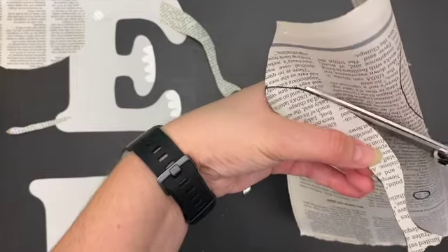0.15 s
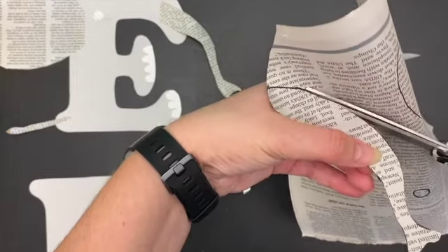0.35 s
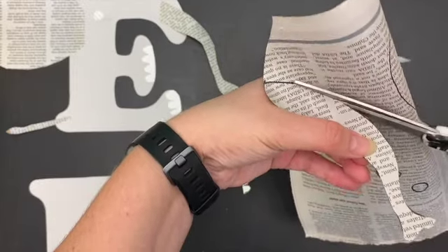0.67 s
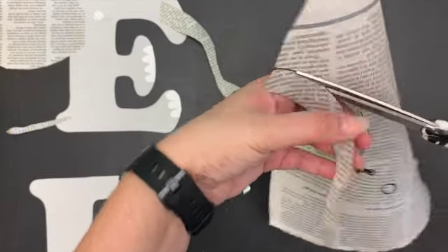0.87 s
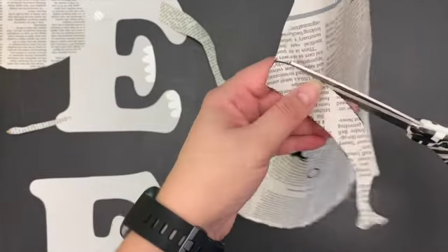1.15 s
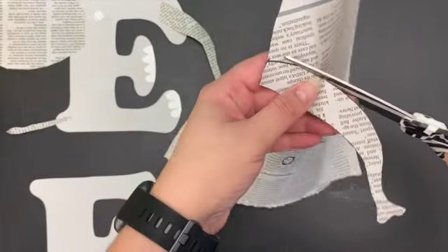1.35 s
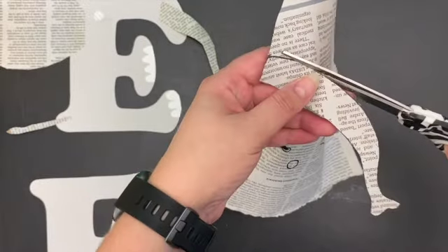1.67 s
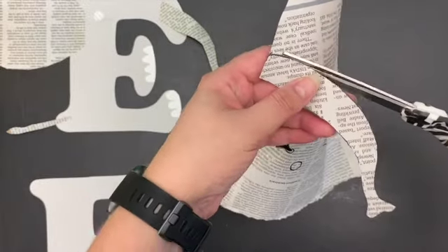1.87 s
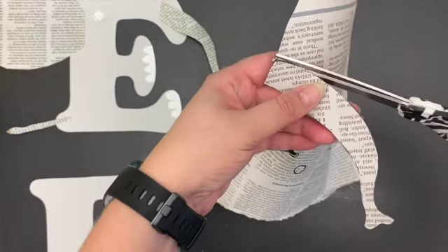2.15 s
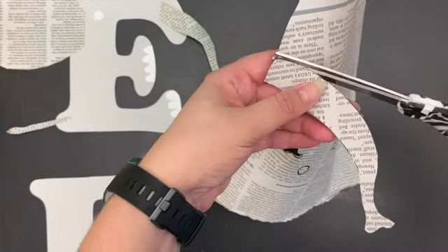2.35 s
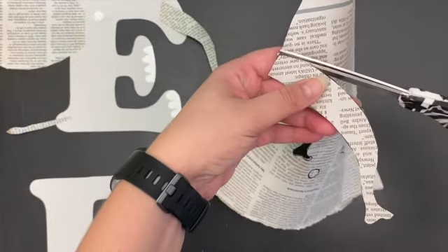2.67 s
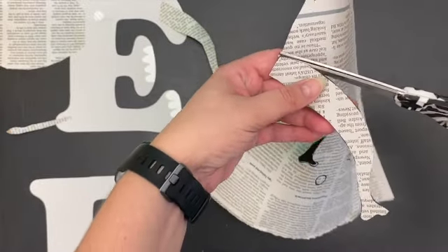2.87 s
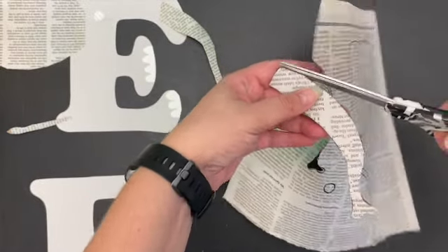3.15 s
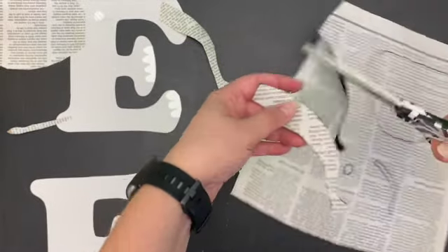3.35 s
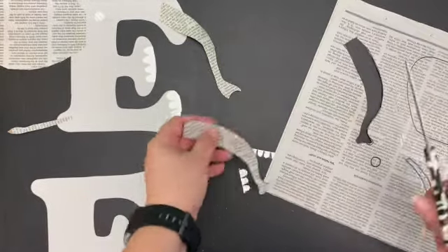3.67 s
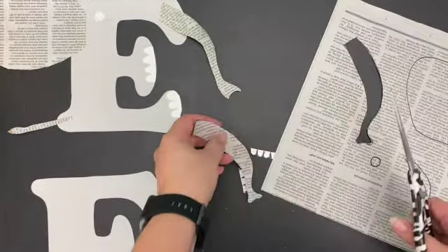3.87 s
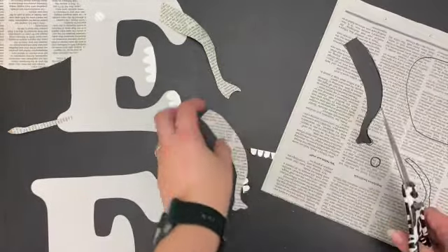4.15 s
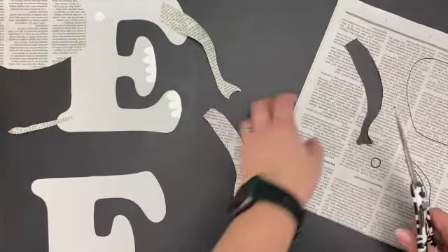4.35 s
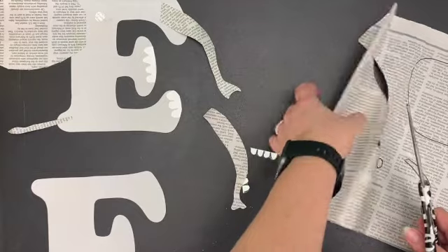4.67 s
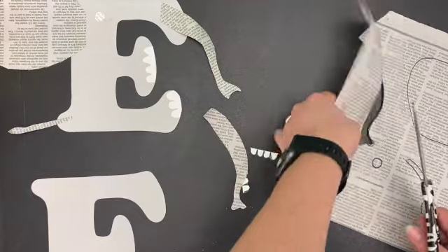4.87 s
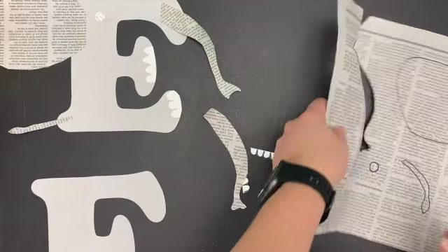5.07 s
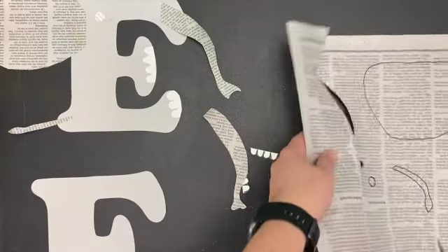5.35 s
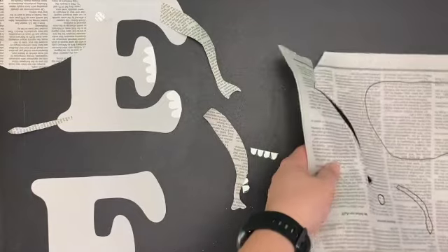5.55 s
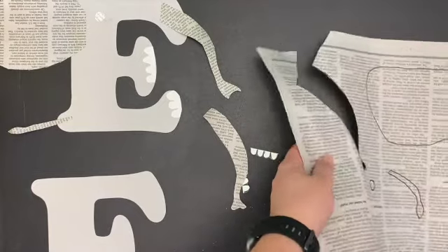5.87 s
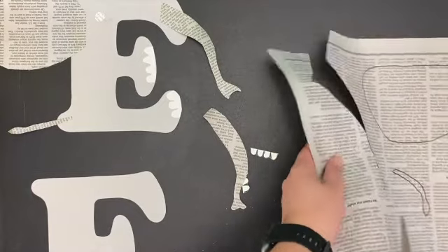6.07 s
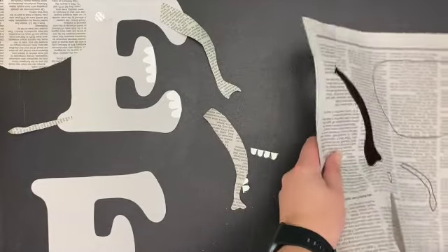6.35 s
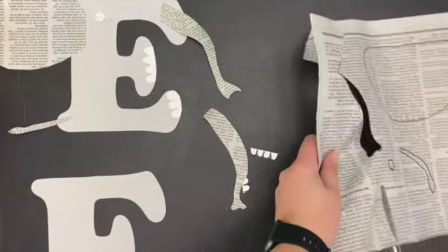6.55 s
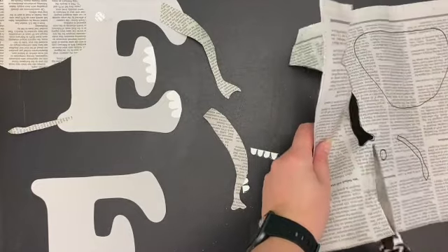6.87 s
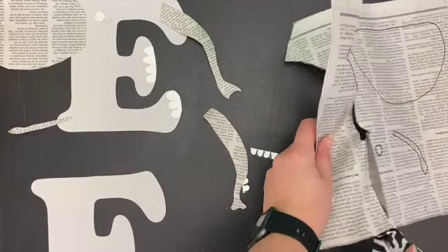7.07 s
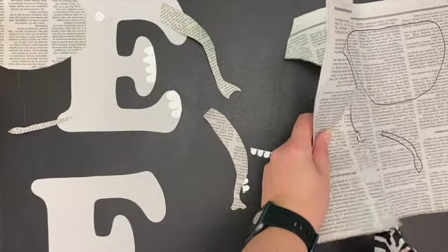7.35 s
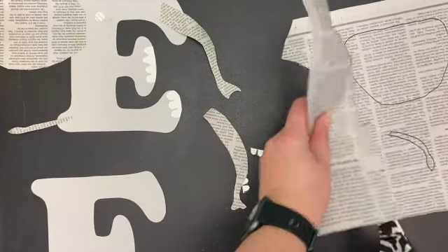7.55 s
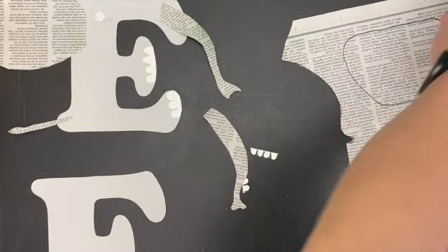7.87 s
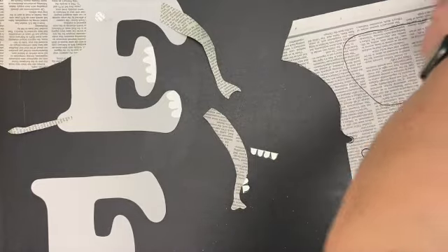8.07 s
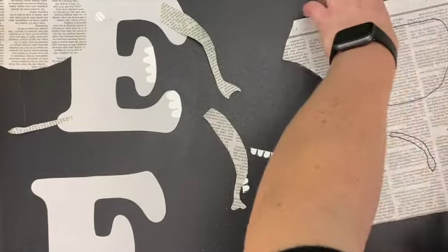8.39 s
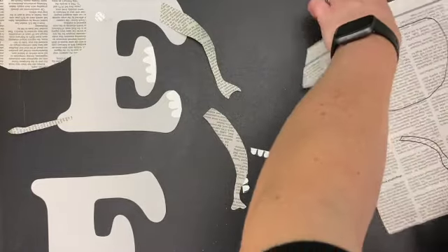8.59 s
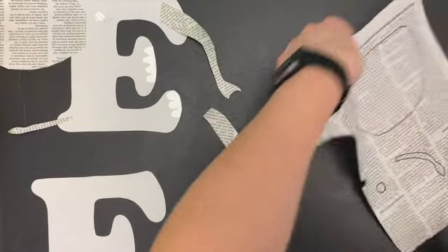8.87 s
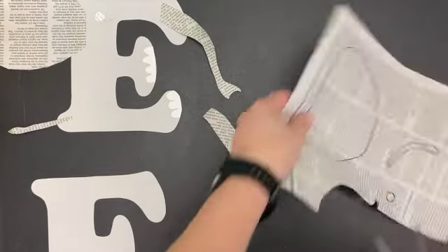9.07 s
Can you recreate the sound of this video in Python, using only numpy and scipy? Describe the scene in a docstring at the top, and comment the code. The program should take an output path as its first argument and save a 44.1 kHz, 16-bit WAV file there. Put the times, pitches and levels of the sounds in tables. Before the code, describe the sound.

Scissors bite through thin newsprint in uneven runs, with fibres crackling and creases popping. After the piece comes free there is a quiet gap, a muffled hand knock on the tabletop and paper sliding. Louder, faster snips follow, then a lull, a solid palm thump, and sharp rustling. Heard from very near, with faint room hum and hiss.

```python
"""Scissors snip through newspaper that rustles, swishes and snaps; a hand lands on a table and drags over it.
Rubbing is coloured noise that catches and slips, with fibres cracking in it; snaps are short coloured bursts.
Landings and drags ring the modes of the table top.
A quiet room adds sparse echoes, hum and hiss; two close microphone ports hear it all."""
import sys
import numpy as np
from scipy import signal
from scipy.fft import rfft, irfft, next_fast_len
from scipy.io import wavfile
from scipy.ndimage import uniform_filter1d

SR = 44100
rng = np.random.default_rng(int(sys.argv[2]) if len(sys.argv) > 2 else 0)


def voltage_ratio(level):
    """Linear amplitude factor for a level in decibels (scalar or array-like)."""
    return 10 ** (np.asarray(level, float) / 20)


def generate_wav(signal):
    """Clip the signal to [-1, 1] and save it as 16-bit WAV at the path in sys.argv[1]."""
    frames = np.transpose(np.atleast_2d(signal))
    scaled = np.clip(frames, -1, 1) * 32767
    pcm = np.round(scaled).astype(np.int16)
    wavfile.write(sys.argv[1], SR, pcm)


N = 406598


def unit_rms(x):
    """Scales to an rms of one."""
    return x / np.sqrt(np.mean(x ** 2) + 1e-20)


def spectrum_at(points, hz):
    """Interpolates a spectrum table over log frequency."""
    point_hz, value = np.transpose(points)
    return np.interp(np.log(hz + 1), np.log(point_hz + 1), value)


def add(mix, start_s, sound):
    """Adds a sound to the mix in place, cut off at the end."""
    part = mix[round(start_s * SR):][:len(sound)]
    part += sound[:len(part)]


def lumps(corner_hz):
    """Random wander of unit rms: noise through a one-pole low-pass."""
    pole = np.exp(-2 * np.pi * corner_hz / SR)
    return unit_rms(signal.lfilter([1], [1, -pole], rng.standard_normal(N)))


def dull(x, corner_hz):
    """Soft contact passes little above its corner: two-pole low-pass."""
    pole = np.exp(-2 * np.pi * corner_hz / SR)
    return signal.lfilter([(1 - pole) ** 2], [1, -2 * pole, pole * pole], x)


def ports(x):
    """The two ports hear one source with their own phase and level."""
    # phase between the ports: hz, left_lead_rad
    lead = [(0, 0), (1000, .2), (1800, -.1), (3200, .7), (5200, .6), (6800, -.3), (8550, -3.14),
            (10200, -6.2), (11800, -6.5), (12700, -9.1), (14100, -9.7), (15200, -12.6), (16600, -12.5)]
    # level between the ports: hz, left_over_right_db
    lean = [(300, -1.7), (3500, 1.8), (9000, 0)]
    size = next_fast_len(N + 2048)
    hz = np.fft.rfftfreq(size, 1 / SR)
    half = np.exp(.5j * spectrum_at(lead, hz)) * voltage_ratio(spectrum_at(lean, hz) / 2)
    return irfft(rfft(x, size) * np.array([half, 1 / half]), size)[:, :N]


def apart(x):
    """Colours the sound that reaches each port alone."""
    # spectrum of sound that only one port hears: hz, gain_db
    alone = [(60, -7.5), (300, -7.5), (1200, 5), (2500, -2.5), (5500, 2.5), (12000, -1.5)]
    size = next_fast_len(N)
    gain_db = spectrum_at(alone, np.fft.rfftfreq(size, 1 / SR))
    return irfft(rfft(x, size) * voltage_ratio(gain_db), size)[:, :N]


def air():
    """Quiet hum and hiss of the room: shaped noise, partly shared by the ports."""
    # relative spectrum of the room tone: hz, density_db_per_hz
    tone = [(15, -19), (25, 10), (102, 8), (229, -3), (309, -1.5), (863, -21.5), (2350, -27.5),
            (8140, -31.5), (9840, -32), (13600, -56), (16000, -28)]
    # room tone sinks late on: time_s, offset_db
    sink = [(6.8, 4.5), (7.5, -2.5)]
    hz = np.fft.rfftfreq(1024, 1 / SR)
    real, imag = rng.standard_normal((N // 256 + 5, 513, 3, 2)).T
    z = (real + 1j * imag) * voltage_ratio(spectrum_at(tone, hz))[:, None]
    noise = signal.istft(z, nperseg=1024, noverlap=768)[1][:, :N]
    level_db = -75.5 + np.interp(np.arange(N) / SR, *np.transpose(sink))
    return voltage_ratio(level_db) * unit_rms(ports(noise[0]) + 1.24 * apart(noise[1:]))


def stroke_power(t):
    """Power of all rubbing and the blades' share of it: cuts hold, swishes swell and fade."""
    # faint rustle of the sheet in the fingers: time_s, level_db
    rustle = [(.6, -86), (.75, -62), (1.09, -54), (1.33, -57), (1.5, -67), (1.87, -76), (2.11, -59),
              (2.5, -61), (2.95, -58), (3.19, -52), (3.47, -61), (3.54, -70), (4.0, -80), (4.25, -100),
              (4.37, -95), (4.4, -62), (5.0, -53), (5.35, -64), (5.95, -62), (6.2, -49), (6.58, -62),
              (6.98, -60), (7.1, -54), (7.4, -64), (7.52, -72), (7.9, -74), (8.0, -80), (8.28, -80),
              (8.4, -62), (8.7, -55), (9.22, -58)]
    # blades close through the sheet: start_s, length_s, first_db, last_db
    cuts = [(0.024, 0.11, -42, -50), (0.177, 0.069, -42.5, -52.5), (0.652, 0.18, -55, -49),
            (0.823, 0.24, -48, -60), (0.987, 0.07, -41, -51), (1.388, 0.025, -42, -78),
            (1.57, 0.077, -56.5, -47.5), (1.665, 0.18, -51, -68.5), (1.926, 0.16, -51, -43.5),
            (2.306, 0.16, -49.5, -54.5), (2.656, 0.24, -59.5, -51.5), (3.192, 0.14, -45, -56),
            (3.334, 0.11, -52, -58), (6.227, 0.23, -41, -43), (6.485, 0.065, -56.5, -44.5),
            (6.629, 0.17, -34.5, -49.5), (6.78, 0.14, -36.5, -40), (7.012, 0.21, -46.5, -42.5),
            (7.22, 0.14, -36, -39.5)]
    # sheet or hand swishes past: loudest_s, level_db, swell_20db_s, fade_20db_s
    swishes = [(.455, -46, .095, .09), (.635, -63, .025, .06), (4.125, -63, .12, .08),
               (4.575, -45, .12, .15), (4.87, -45, .14, .14), (5.235, -50, .08, .05), (5.55, -56, .3, .2),
               (5.982, -48, .008, .08), (7.72, -60, .25, .25), (7.93, -64, .12, .07),
               (8.08, -61, .025, .11), (8.222, -70, .008, .09), (8.297, -53, .01, .15),
               (8.735, -41, .07, .03), (8.43, -48, .1, .07), (8.6, -40, .06, .1), (8.76, -41, .03, .08),
               (8.85, -44, .05, .25), (9.09, -49, .2, .12)]
    bite_s, let_go_db_per_s = 0.025, 450
    cut = np.zeros(len(t))
    slide = voltage_ratio(2 * np.interp(t, *np.transpose(rustle)))
    for start_s, length_s, first_db, last_db in cuts:
        end_s = start_s + length_s
        db = np.interp(t, [start_s, end_s], [first_db, last_db])
        db = db - let_go_db_per_s * np.maximum(t - start_s - length_s, 0)
        cut = cut + np.clip((t - start_s) / bite_s, 0, 1) ** 2 * voltage_ratio(2 * db)
    for loudest_s, level_db, swell_s, fade_s in swishes:
        away = np.abs((t - loudest_s) / np.where(t < loudest_s, swell_s, fade_s))
        slide = slide + voltage_ratio(2 * (level_db - 20 * away ** 1.5))
    return cut + slide, cut / (cut + slide)


def crackle():
    """Fibres crack in clumps, each a brief rough ring at one of twelve pitches; a few are large."""
    cracks_per_s, decay_s = 600, .0008
    clump = voltage_ratio(5 * lumps(25))
    cracks = rng.random(N) < cracks_per_s / SR * clump / clump.mean()
    size = cracks * voltage_ratio(4 * np.minimum(rng.exponential(1, N), 2.5))
    pitches_hz, t = np.geomspace(900, 9000, 12), np.arange(256) / SR
    kind, out = rng.integers(0, len(pitches_hz), N), np.zeros(N)
    noises = rng.standard_normal((len(pitches_hz), len(t)))
    for k, (hz, noise) in enumerate(zip(pitches_hz, noises)):
        ring = (np.sin(2 * np.pi * hz * t) + noise) * np.exp(-t / decay_s)
        out += signal.oaconvolve(size * (kind == k), unit_rms(ring))[:N]
    return unit_rms(out)


def sheet_db(hz, ring_hz, ring_db, treble_db, bass_db, knee_hz=3500):
    """The sheet's colour: the free patch rings broadly, tight creases are bright, wide flexing is dull."""
    # what the sheet radiates: hz, gain_db
    paper = [(150, -63), (340, 6), (620, -4.5), (950, 1), (1420, -3), (2500, 0.5), (3600, -1), (6000, -2.5),
             (8500, 2), (11000, -1), (13500, -3), (15700, -1)]
    ring = np.exp(-(np.log2((hz + 1) / ring_hz) / 0.36) ** 2)
    high = np.clip(np.log2((hz + 1) / knee_hz) / 1.14, 0, 1)
    low = np.clip(np.log2(680 / (hz + 1)) / 1.4, 0, 1)
    return spectrum_at(paper, hz) + ring * ring_db + high * treble_db + low * bass_db


def patchwork(shape, bins, frames):
    """Random unit-rms map over frequency and time, smoothed over bins and frames."""
    chance = rng.standard_normal(shape[::-1]).T
    return unit_rms(uniform_filter1d(uniform_filter1d(chance, bins, 0), frames, 1))


def rub():
    """Hiss that catches and slips, with single fibres cracking in clumps, coloured by the sheet."""
    # colour as the sheet is bent and turned: time_s, ring_hz, ring_db, treble_db, bass_db
    holds = [(0, 2600, 1, -3, 5.5), (1.1, 1400, 5, -4, 9), (2.05, 2200, 2.5, -7, 4),
             (2.72, 1230, 9, -2.5, -8.5), (3.36, 2090, 4, -3, -11), (3.49, 2800, 21.5, 9, 5),
             (3.58, 1750, 10.5, 1.5, 29.5), (3.95, 1690, 8.5, -11, 25), (4.1, 2800, -2, 2.5, 2),
             (4.45, 1200, -12, -9, 12), (4.6, 2320, 3, -5.5, 2), (5.24, 5400, 0.5, -3, -8),
             (5.5, 2080, 2, -8.5, -22), (6.101, 2300, 5.5, -4.5, 4), (6.9, 2520, -3.5, -11, -18),
             (7.35, 2270, 4.5, -10.5, -32.5), (7.56, 1950, 9, 5.5, -22), (7.66, 2050, 11, 0, -24.5),
             (7.84, 2360, 5.5, -1, -8), (7.93, 2450, 7, -2.5, -16), (8.1, 3500, 2, 7, -15),
             (8.35, 1000, -2.5, -7.5, 23), (8.66, 2520, -0.5, -6, 9.5), (9.22, 1840, 7, -8.5, 5.5)]
    slide_grip, shear_grip = .6, 1.05  # closing blades catch and slip more than sliding paper
    hiss_db, crackle_db = -1.5, -8
    now_s = np.arange(N) / SR
    coarse_s = np.arange(0, N / SR + .002, .001)
    power, shear = (np.interp(now_s, coarse_s, c) for c in stroke_power(coarse_s))
    grip = slide_grip + (shear_grip - slide_grip) * shear
    grip_db = grip * (4.5 * np.tanh(lumps(40)) + 2.0 * lumps(400)) - 1.4 * grip ** 2
    hiss = voltage_ratio(grip_db + hiss_db) * rng.standard_normal(N)
    cracks = voltage_ratio(crackle_db) * grip ** 2 * crackle()
    drive = (hiss + cracks) * np.sqrt(power)
    hz, t, z = signal.stft(drive, SR, nperseg=256, noverlap=192)
    patches = patchwork(z.shape, 5, 14)
    crunch = patchwork(z.shape, 7, 4)  # each torn patch has its own pitch
    patches = patches + 1.2 * np.interp(t, now_s, shear) * crunch
    time_s, *hold = np.transpose(holds)
    ring_hz, ring_db, treble_db, bass_db = (np.interp(t, time_s, c) for c in hold)
    colour_db = sheet_db(hz[:, None], ring_hz, ring_db, treble_db, bass_db)
    return signal.istft(z * voltage_ratio(colour_db + 1.7 * patches), SR, nperseg=256, noverlap=192)[1][:N]


def snaps():
    """Fibres or creases give way, swelling within a few milliseconds after a faint onset: a noise puff and a
    crack, hardest when strong and short. The hand's slap on the table at 4.383 s and its hard knock at 8.51 s
    click the same way."""
    # fibres or creases giving way, and at 4.383 s and 8.5106 s the click of the hand slapping and knocking on
    # the table: time_s, level_db, ring_hz, treble_db
    events = [(0.031, -43, 2700, -1), (0.186, -40.5, 2750, 6), (0.2476, -40.5, 1760, 3),
              (0.756, -40.5, 1260, -20), (0.818, -31.5, 1870, -17), (0.957, -41, 650, -30),
              (1.1178, -34, 1020, -5.5), (1.529, -50.5, 2500, -2.5), (1.597, -44, 2600, 2),
              (1.727, -41, 1600, 3), (1.757, -44.5, 1090, 3), (2.0827, -38.5, 1750, -2),
              (2.3024, -37.5, 1700, -4.5), (2.374, -41.5, 1770, -2.5), (2.405, -39, 1920, -7),
              (2.46, -40, 1070, -6), (2.542, -38, 1100, -7.5), (2.581, -45, 1780, -27),
              (2.609, -49, 3080, -3), (2.6578, -39.5, 1470, -9), (2.733, -43.5, 1960, -25),
              (2.776, -49, 1300, 0), (2.79, -39.5, 1300, -26), (2.8226, -38, 1740, -4.5),
              (2.9969, -35.5, 1150, -5), (3.205, -32, 1970, -22), (3.366, -41.5, 2120, -2),
              (3.395, -41, 1980, -28), (3.483, -40, 3000, -15), (3.763, -65, 9800, 8),
              (4.383, -43, 800, -12), (4.473, -52, 9850, 8), (4.56, -36.5, 2550, 4.5),
              (4.588, -35.5, 4300, 1.5), (4.673, -35, 3000, -17), (4.79, -39.5, 1950, -14),
              (4.844, -35.5, 2780, -28), (4.8774, -32, 2190, -21), (4.8933, -31, 1700, -26),
              (5.097, -41, 1150, -30), (5.237, -39, 3600, 8.5), (5.281, -39, 1250, -26.5),
              (5.679, -51.5, 1690, -59), (5.974, -25.5, 1680, -5), (5.999, -29.5, 1230, -22),
              (6.194, -34, 2130, -24.5), (6.253, -30.5, 2630, -24), (6.4093, -29.5, 3830, -6),
              (6.427, -29.5, 940, -21), (6.536, -47, 2700, 8), (6.587, -33, 875, -20),
              (6.616, -25, 2450, 6), (6.6632, -37.5, 3430, -4), (6.798, -34.5, 2300, -11),
              (6.858, -33, 2230, -38), (6.907, -26, 1020, -8.5), (6.9938, -30.5, 990, -13.5),
              (7.115, -43, 2720, 2), (7.203, -33.5, 1010, -53), (7.2393, -30, 1730, 1.5),
              (7.2834, -30, 2710, -6), (7.304, -34, 1000, 2.5), (7.32, -27.5, 1590, -4),
              (7.764, -54.5, 2300, -11), (8.024, -60, 10500, 6), (8.289, -50, 1500, -7),
              (8.428, -44, 4100, -8), (8.4492, -34, 3300, -6), (8.4895, -37, 2540, -20),
              (8.5106, -34, 1400, -15), (8.561, -36.5, 2570, 6), (8.5766, -28, 2570, 2.5),
              (8.591, -34.5, 2590, -38), (8.7504, -21.5, 2920, -13.5), (8.8406, -27, 1880, -7.5),
              (8.883, -35, 1080, -7.5)]
    lead_in_s, size = .02, 4096
    out = np.zeros(N)
    t, hz = np.arange(size) / SR - lead_in_s, np.fft.rfftfreq(size, 1 / SR)
    after = np.maximum(t, 0)
    build = np.exp(np.minimum(t - .0015, 0) / 0.00083)
    build = build + 0.043 * np.exp(np.minimum(t, 0) / 0.0037) * (t < 0)  # faint onset before the snap
    chance = rng.standard_normal((len(events), 2, size))
    for (time_s, level_db, ring_hz, treble_db), (noise, patch) in zip(events, chance):
        length_s = 0.0063 / voltage_ratio(0.35 * (level_db + 37.5))  # stronger snaps are over sooner
        crack = voltage_ratio(.7 * level_db + 24.5) * .006 / length_s * np.exp(-abs(t - .002) / .00004)
        puff = build * (np.exp(-(after / length_s) ** 2) + 0.014 * voltage_ratio(-60 * after / 0.023))
        patch_db = 2.2 * unit_rms(uniform_filter1d(patch, 40))[:len(hz)]
        # a small patch radiates little far below its ring: 7 dB per octave
        thin_db = 7 * np.clip(np.log2(0.44 * ring_hz / (hz + 1)), 0, 2)
        # dull snaps keep only their ring
        knee_hz = np.interp(treble_db, [-40, -10], [ring_hz, 2 * ring_hz + 1000])
        ring_db = 7.0 + .2 * (level_db + 35) + .25 * max(-treble_db - 20, 0)
        colour_db = sheet_db(hz, ring_hz, ring_db, treble_db, -5.0, knee_hz) - thin_db
        burst = irfft(rfft(noise * puff + crack) * voltage_ratio(colour_db + patch_db))
        add(out, time_s - lead_in_s, voltage_ratio(level_db) * burst)
    return out


def table():
    """Blows and the dull rumble of dragging skin ring the modes of the table top."""
    # hand lands, fingers settle: start_s, level_db, settle_t60_s, hardness_hz
    landings = [(1.118, -45, 0.029, 250), (7.626, -64, 0.023, 400), (4.16, -44.5, 0.067, 580),
                (4.383, -32.5, 0.21, 1130), (4.655, -42, 0.12, 700), (8.29, -30, 0.15, 320),
                (8.5112, -19, 0.16, 1530)]
    # hand drags and slows: start_s, level_db, t60_s
    drags = [(4.433, -38, 1.05), (4.684, -35.5, 0.48), (8.31, -30, 0.69)]
    # modes of the table top: mode_hz, width_hz, level_db
    modes = [(61.4, 53, -8.5), (104, 15.6, -8), (174, 28, -5.5), (315, 14, -2.5), (393, 43, -4),
             (550, 62, -3), (740, 740, -2.5), (1400, 2800, 0.5)]
    blow, blow_s = 8.0, .0005  # first push, over the settling fingers
    drag, t = np.zeros(N), np.arange(SR) / SR
    for start_s, level_db, t60_s in drags:
        add(drag, start_s, voltage_ratio(level_db - 60 * t / t60_s))
    rumble = uniform_filter1d(drag, 600) * rng.standard_normal(N) * voltage_ratio(2.0 * lumps(33.0))
    drive = dull(rumble, 1240)
    u = t[:SR // 2]
    noises = rng.standard_normal((len(landings), len(u)))
    for (start_s, level_db, t60_s, hard_hz), noise in zip(landings, noises):
        # flesh flattens before it presses
        settle = (1 - np.exp(-u / 0.0006)) * voltage_ratio(level_db - 60 * u / t60_s)
        push = dull((noise + blow * np.exp(-u / blow_s)) * settle, hard_hz)
        # a hard knock is too brief to move the deep modes
        add(drive, start_s, push - dull(push, .09 * hard_hz))
    rings = []
    for hz, width_hz, level_db in modes:
        decay = np.sqrt(width_hz / SR) * np.exp(-np.pi * width_hz * u)
        rings.append(voltage_ratio(level_db) * decay * np.sin(2 * np.pi * hz * u))
    # neighbouring modes swing oppositely
    return signal.oaconvolve(drive, sum(rings[::2]) - sum(rings[1::2]))[:N]


def room(x):
    """Sparse echoes of random sign, each band dying at its own speed, other ones at each port."""
    # decay of the echoes: hz, t60_s
    walls = [(200, 0.25), (1000, 0.1), (4000, 0.12), (12000, 0.057)]
    taps = np.zeros((3, SR // 2))
    slots = np.arange(120, SR // 2 - 20, 20)
    at = slots + rng.integers(0, 20, (3, len(slots)))
    np.put_along_axis(taps, at, rng.choice([-1., 1.], (3, len(slots))), 1)
    hz, t, z = signal.stft(taps, SR, nperseg=256)
    fade = voltage_ratio(-60 * t / spectrum_at(walls, hz)[:, None])
    tail = signal.istft(z * fade, SR, nperseg=256)[1]
    wet = signal.fftconvolve(x[None], tail / np.linalg.norm(tail[0]), axes=1)[:, :N]
    return voltage_ratio(-24.0) * ports(wet[0]) + voltage_ratio(-7.5) * apart(wet[1:])


def scene():
    """Paper, blades and table close by, the room around them."""
    near = rub() + snaps() + table()
    return ports(near) + room(near) + air()


def roll_off(x):
    """The treble ends steeply here."""
    return signal.sosfilt(signal.butter(12, 17070, fs=SR, output="sos"), x)


def record(dry):
    """The microphone's band: 45 Hz high-pass, 16 kHz low-pass."""
    low_cut = signal.sosfilt(signal.butter(3, 45, "high", fs=SR, output="sos"), dry)
    low_pass = signal.firwin(255, 16000, window=("kaiser", 7), fs=SR)
    band = signal.oaconvolve(low_cut, low_pass[None], "same")
    return roll_off(band)


dry = scene()
out = record(dry)
generate_wav(out)
```